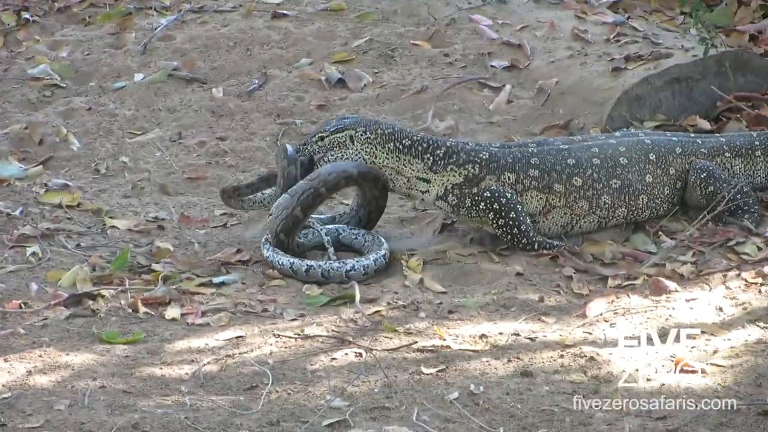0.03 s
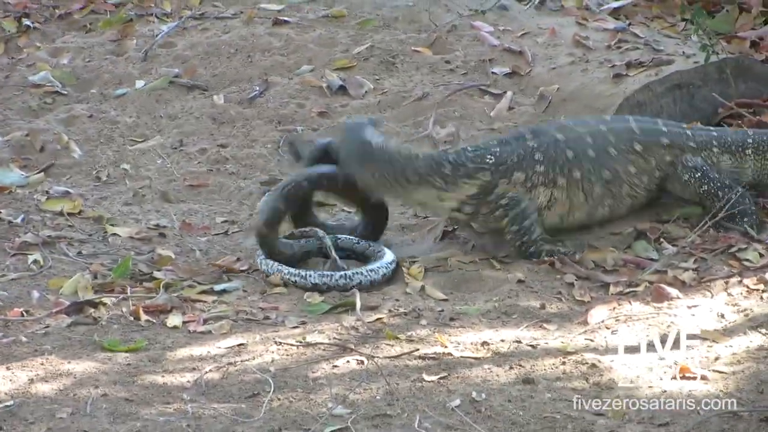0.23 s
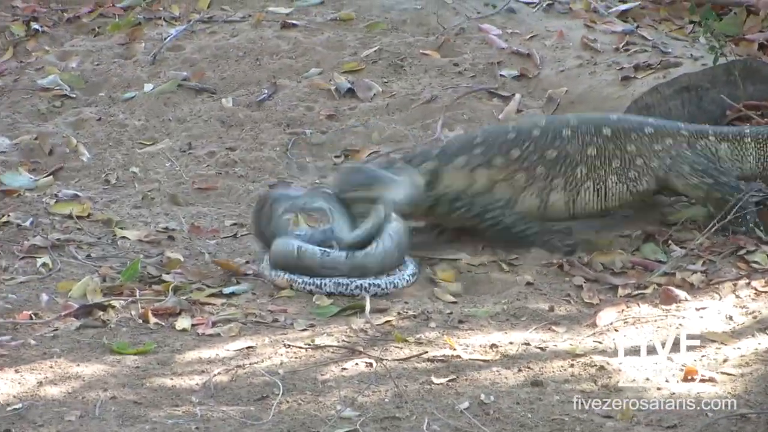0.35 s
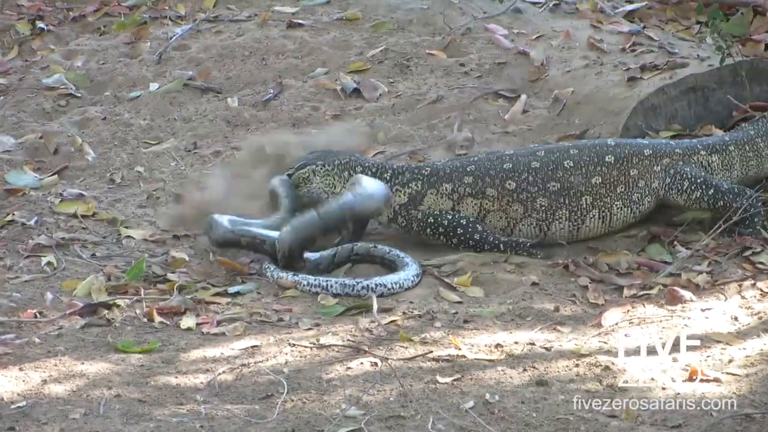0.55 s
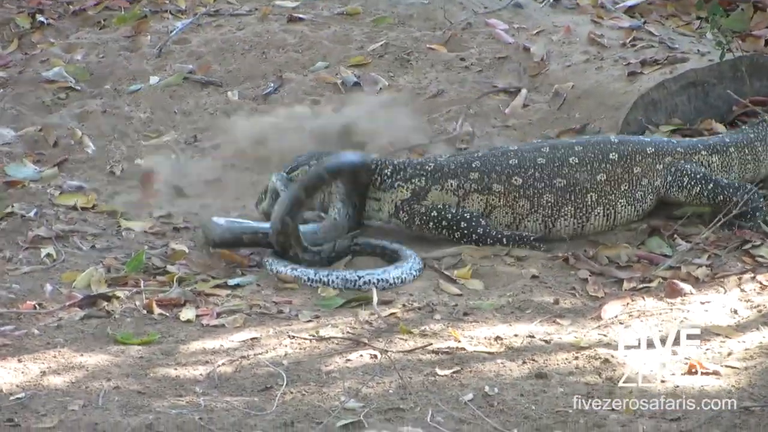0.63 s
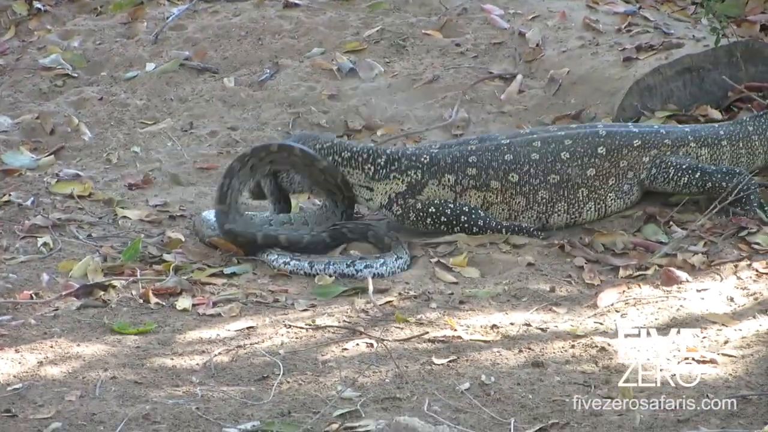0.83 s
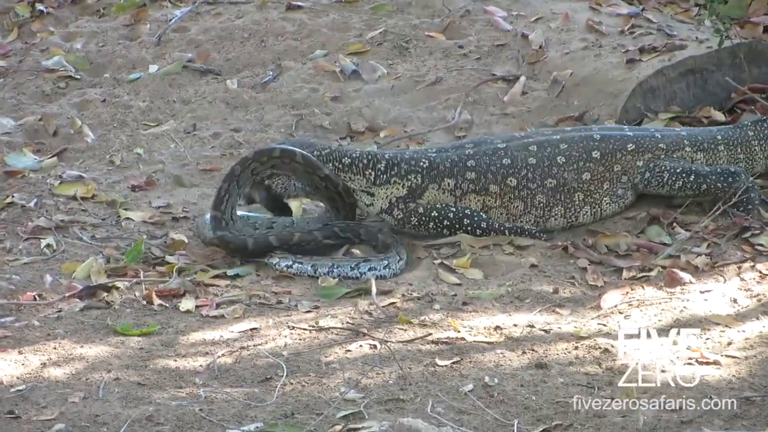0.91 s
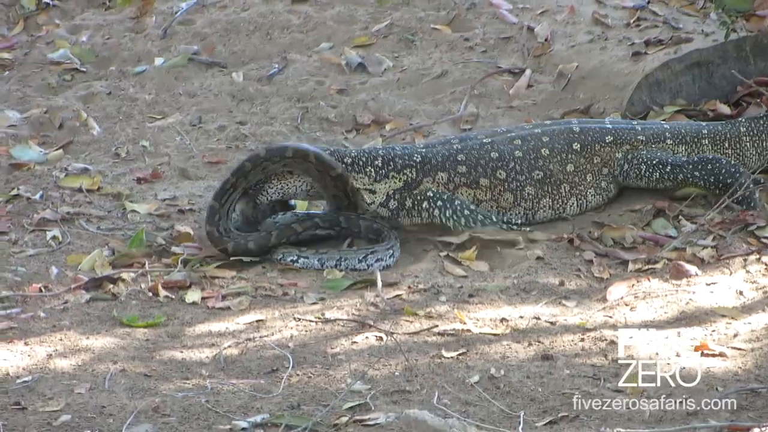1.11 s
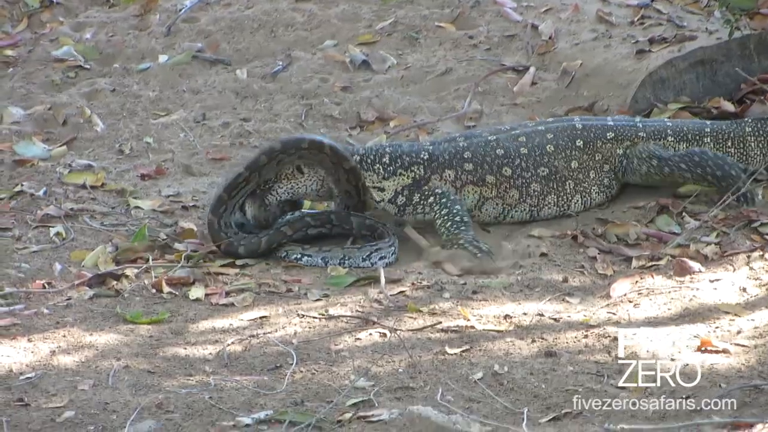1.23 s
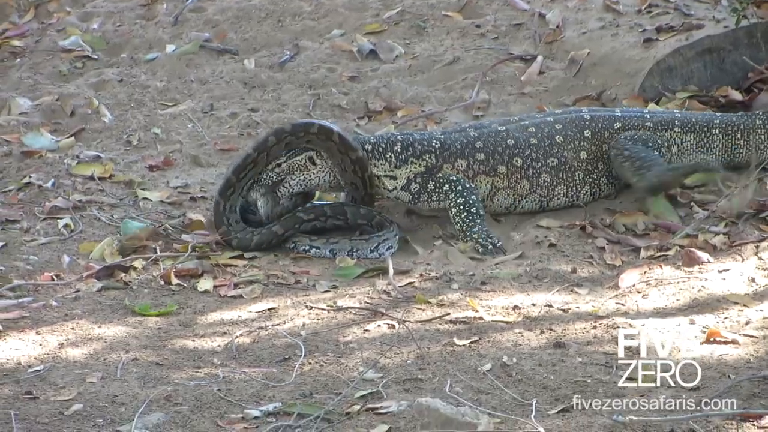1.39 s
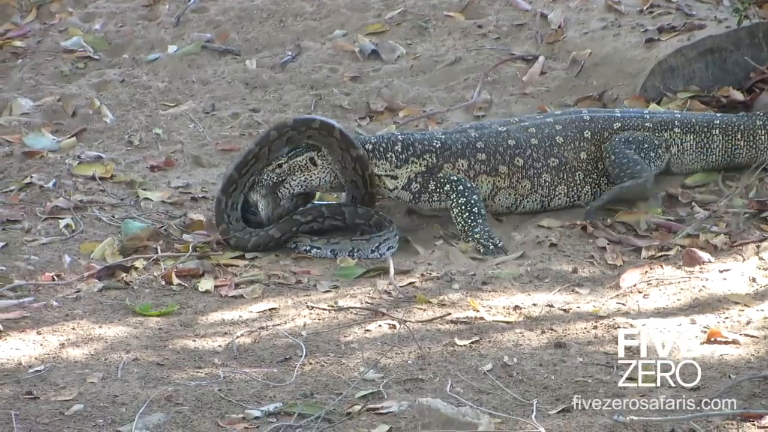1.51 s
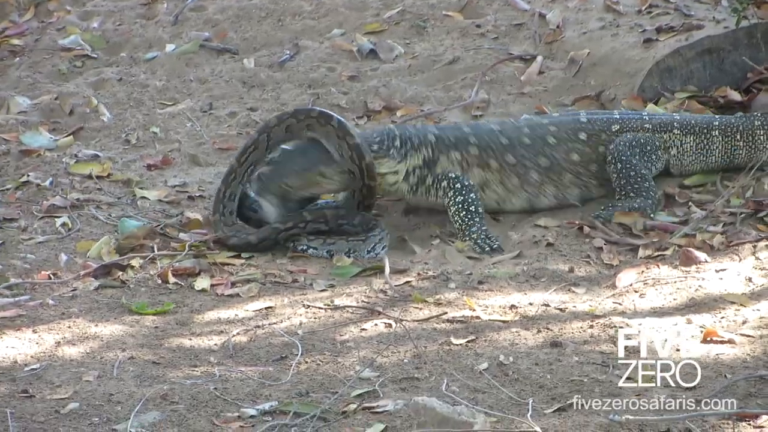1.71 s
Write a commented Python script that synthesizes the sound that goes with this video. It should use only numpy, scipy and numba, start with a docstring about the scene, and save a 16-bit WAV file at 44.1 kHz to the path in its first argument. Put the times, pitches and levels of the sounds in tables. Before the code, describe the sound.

Two breathy reptile hisses, first hard and whistling, then softer, over cicadas and bird ticks

```python
"""Lizard and python wrestling on dry leaves

Two hisses are rushing air: noise through resonances. The hard one swells into a thin whistle; the soft one
stays more level. Bumps are short noise bursts, leaves are many random clicks, and a small bird ticks about
six times a second, in two runs, with very fast falling whistles. Cicadas are a flickering band of noise
under a thin note; the bush is wide, steady noise, with a faint electronic hum and whine."""
import sys
import numpy as np
from scipy import signal
from scipy.fft import rfft, irfft
from scipy.io import wavfile
from scipy.ndimage import uniform_filter1d
from numba import njit

SR = 44100
rng = np.random.default_rng(int(sys.argv[2]) if len(sys.argv) > 2 else 0)


def generate_wav(signal):
    """Clip the signal to [-1, 1] and save it as 16-bit WAV at the path in sys.argv[1]."""
    frames = np.transpose(np.atleast_2d(signal))
    scaled = np.clip(frames, -1, 1) * 32767
    pcm = np.round(scaled).astype(np.int16)
    wavfile.write(sys.argv[1], SR, pcm)


N = 77175  # length of the scene [samples]


def undb(db):
    """Turn decibels into a gain."""
    return 10 ** (np.asarray(db) / 20)


def unit(x):
    """Scale a signal to an average strength (rms) of 1."""
    return x / np.sqrt(np.mean(x ** 2))


def times():
    """Give the time of each sample [s]."""
    return np.arange(N) / SR


def bins():
    """Give the frequency of each spectral bin [Hz], kept just above zero so that its log exists."""
    return np.arange(N // 2 + 1) * SR / N + 1e-3


def slope(points):
    """Draw a gain per bin through (frequency, dB) points, straight on a log-frequency axis."""
    hz, db = np.array(points).T
    return undb(np.interp(np.log(bins()), np.log(hz), db))


def colour(x, gain):
    """Filter a signal by a gain per bin, then scale it to rms 1."""
    return unit(irfft(rfft(x) * gain, N))


def noise(gain):
    """Make coloured noise of rms 1."""
    return colour(rng.standard_normal(N), gain)


def walk(rate):
    """Wander smoothly at random, with rms 1, from about `rate` new values a second."""
    hold = int(SR / rate)  # samples per random value
    steps = np.repeat(rng.standard_normal(N)[:N // hold + 1], hold)
    smooth = uniform_filter1d(uniform_filter1d(steps, hold), hold)
    return unit(smooth[:N])


def stereo(mid, side):
    """Turn what both ears share (mid) and what is opposed between them (side) into left and right."""
    return np.array([mid + side, mid - side])


@njit
def resonate(x, hz, width):
    """Ring a band-pass resonance whose centre frequency can move from sample to sample."""
    out, band, low = np.empty(len(x)), 0., 0.
    for i in range(len(x)):
        g = np.tan(np.pi * hz[i] / SR)
        damping = width / hz[i]
        v = (band + g * (x[i] - low)) / (1 + g * (g + damping))
        band = 2 * v - band
        low = low + 2 * g * v
        out[i] = damping * v
    return out


def hiss(pressure, air, whistles):
    """Rushing air rings fixed resonances and brightens with pressure; gliding resonances rise in pitch."""
    # fixed resonances that both hisses ring: (centre [Hz], width [Hz], lift [dB])
    resonances = [(2550, 90, 3), (2915, 90, 6), (3280, 110, 4), (3745, 55, 9), (4128, 45, 10),
                  (4205, 40, 7), (4405, 60, 9), (4975, 50, 6), (5100, 60, 7), (5475, 100, 7),
                  (5815, 65, 12), (5945, 40, 4), (6180, 45, 5)]
    # stereo width of the rush: (frequency [Hz], side level relative to mid [dB])
    spread = [(200, 0), (1500, -17), (3000, -18.5), (5800, -16), (8000, -10), (10500, -9), (15000, -3)]
    ripple_db, ripple_hz = 2.5, 35.54  # random unevenness of the spectrum and its spacing
    treble_hz, treble_lag_s = 3770, 0.038  # the treble follows the pressure a little late
    treble_growth = 0.15  # extra dB of treble per dB of pressure
    glide_range_db = 6  # pitches glide only within this much of full pressure
    pan_db = -.7  # left level relative to right

    at, levels = np.array(pressure).T
    db = np.interp(times(), at, levels, left=-100, right=-100)
    strain = np.maximum(db - levels.max(), -20)  # dB relative to full pressure, never above 0

    lift = sum(up / (1 + (2 * (bins() - hz) / width) ** 2) for hz, width, up in resonances)
    grid = np.arange(0, SR / 2, ripple_hz)
    ripple = ripple_db * np.interp(bins(), grid, rng.standard_normal(N)[:len(grid)])
    mid_gain = slope(air) * undb(lift + ripple)
    side_gain = mid_gain * slope(spread)
    side_level = np.sqrt(np.sum(side_gain ** 2) / np.sum(mid_gain ** 2))
    rush = stereo(noise(mid_gain), noise(side_gain) * side_level)

    low = irfft(rfft(rush) / (1 + (bins() / treble_hz) ** 10), N)
    treble = rush - low
    late_strain = np.interp(times() - treble_lag_s, times(), strain)
    out = low + treble * undb(treble_growth * late_strain)

    for hz, width, rise, level, growth in whistles:
        centre = hz + rise * np.maximum(strain, -glide_range_db)
        ring = resonate(rng.standard_normal(N), centre, 1. * width)
        ring = resonate(ring, centre, 2. * width)
        # growth less 1, because the whole hiss follows the pressure below
        out = out + unit(ring) * undb(level + (growth - 1) * strain)
    pan = undb(np.array([[pan_db], [-pan_db]]) / 2)
    return out * undb(db) * pan


def hard_hiss():
    """A forceful breath: high air pressure drives the rush and strongly gliding resonances."""
    # air pressure of the breath: (time [s], level [dB])
    pressure = [(.12, -71), (.196, -46), (.31, -37.5), (.41, -33.5), (.46, -33), (.52, -33.5), (.6, -35),
                (.745, -39), (.785, -46), (.83, -60)]
    # colour of the turbulence at the mouth: (frequency [Hz], relative level per Hz [dB])
    air = [(60, -37), (300, -31.5), (1000, -16.5), (1750, -26), (2300, -12), (3100, 0), (3600, -4),
           (4400, -2.5), (6000, -1.5), (7200, -7), (8900, -11.5), (10400, -6.5), (11800, -19), (15500, -27)]
    # gliding resonances: (centre at full pressure [Hz], width of first pass [Hz], rise [Hz per dB],
    # level at full pressure relative to the rush's base level [dB], growth [dB per dB of pressure])
    whistles = [(2944, 140, 39, -12.5, 1.5), (5840, 520, 68, -6.5, 1.5), (4390, 90, 57, -13, 2.0),
                (1435, 27, 22.5, -24, 1.2), (2820, 520, 30, -15, 0.3)]
    return hiss(pressure, air, whistles)


def whistle():
    """At the height of the hard hiss the air jet locks into a thin, wobbling tone that arches up and sinks."""
    # path of the tone before wobble and flutter: (time [s], pitch [Hz], level [dB])
    tone = [(.33, 2760, -60), (.395, 2860, -43), (.47, 2965, -39), (.525, 2920, -39.5), (.61, 2810, -46),
            (.7, 2640, -60)]
    wobble_hz, flutter_db = 22, 2.2  # rms of the random changes in pitch and level
    at, pitch, level = np.array(tone).T
    hz = np.interp(times(), at, pitch) + wobble_hz * walk(120)
    db = np.interp(times(), at, level, left=-120, right=-120) + flutter_db * walk(90.5)
    phase = 2 * np.pi * np.cumsum(hz) / SR
    return np.sqrt(2) * undb(db) * np.sin(phase)


def soft_hiss():
    """A gentler, more level breath: lower pressure drives softer rushing air and fewer gliding resonances."""
    # air pressure of the breath: (time [s], level [dB])
    pressure = [(.875, -59.5), (.94, -45), (.98, -42), (1.1, -39.5), (1.3, -41.5), (1.49, -42.5),
                (1.52, -52), (1.57, -63)]
    # colour of the turbulence at the mouth: (frequency [Hz], relative level per Hz [dB])
    air = [(60, -58), (400, -28), (1000, -20), (1750, -15.5), (2200, -7.5), (2500, -0.5), (3100, 2.5),
           (3600, -5.5), (5800, -4.5), (7200, -8), (8900, -15), (10600, -11), (11900, -26), (15500, -32)]
    # gliding resonances: (centre at full pressure [Hz], width of first pass [Hz], rise [Hz per dB],
    # level at full pressure relative to the rush's base level [dB], growth [dB per dB of pressure])
    whistles = [(2980, 550, 13, -16, 1.2), (1312, 34, 14, -22.5, 1)]
    return hiss(pressure, air, whistles)


def bumps():
    """Bodies bump the earth: each soft thud is a noise burst that starts fast and dies away."""
    # thuds: (time [s], level before the burst's shape [dB])
    thuds = [(0.433, -47), (.547, -55.5)]
    # colour of a thud: (frequency [Hz], relative level per Hz [dB])
    thud_colour = [(50, -18), (120, -2), (180, 9.5), (300, -6), (1000, 4.5), (2500, -33), (8000, -45)]
    attack_s, decay_s = 0.004, 0.015
    out = np.zeros((2, N))
    for start, db in thuds:
        age = np.maximum(times() - start, 0)
        shape = np.minimum(age / attack_s, 1) * np.exp(-age / decay_s)
        burst = stereo(noise(slope(thud_colour)), noise(slope(thud_colour)) / 2)
        out += undb(db) * shape * burst
    return out


def leaves():
    """Dry leaves crackle: many random clicks on each side, coloured and swelling once."""
    # colour of the crackle: (frequency [Hz], relative level per Hz [dB])
    leaf_colour = [(60, -18), (200, -1), (320, 16), (500, -2), (1050, 9), (2000, 17.5), (6000, -13),
                   (15000, -20)]
    peak_s, width_s, peak_db = .42, 0.17, -52  # the swell
    clicks_per_s = 1000  # average, on each side
    clicks = (rng.random((2, N)) < clicks_per_s / SR) * rng.standard_normal((2, N))
    crackle = np.array([colour(side, slope(leaf_colour)) for side in clicks])
    swell = np.exp(-((times() - peak_s) / width_s) ** 2 / 2)
    return crackle * undb(peak_db) * swell


def bird():
    """Each tick is a very fast falling whistle, scattered briefly by the trees."""
    # ticks: (time [s], peak level [dB])
    ticks = [(.055, -42.5), (.217, -44), (0.844, -39.5), (.998, -37), (1.154, -36.5), (1.307, -37),
             (1.463, -39.5), (1.619, -37.5)]
    top_hz, fall_s = 5150, .0135  # starting pitch and how fast it falls
    attack_s, decay_s = 0.0024, 0.0046
    echo_db, echo_s = -4, 0.062  # echo strength and how fast it fades
    t, calls = times(), np.zeros(N)
    for start, db in ticks:
        age = np.maximum(t - start, 0)
        phase = 2 * np.pi * top_hz * fall_s * (1 - np.exp(-age / fall_s))
        attack = np.minimum(age / attack_s, 1) ** 2
        decay = np.exp(-np.maximum(age - attack_s, 0) / decay_s)
        calls += undb(db) * attack * decay * np.sin(phase)

    # the scattered echo is a fading tail of noise, one for mid and one for side
    trees = rng.standard_normal((2, N)) * np.exp(-t / echo_s)
    trees /= np.sqrt(np.sum(trees ** 2, axis=1, keepdims=True))
    mid, side = (undb(echo_db) * signal.fftconvolve(calls, tail)[:N] for tail in trees)
    return stereo(calls + mid, side / 2)


def insects():
    """Cicadas drone as a band of noise with a random throb, with one thin, slightly wavering note."""
    # colour of the drone: (frequency [Hz], relative level per Hz [dB])
    cicadas = [(3000, -25), (6300, -18), (7000, -7), (7800, -2.5), (8300, -7.5), (9000, -18), (12000, -38)]
    drone_db, side_db = -51, -7  # mid level, and side relative to mid
    throb_db, throb_hz = 0.48, 90  # rms level change, and random values per second
    note_hz, waver_hz, note_db = 7740, 8.3 / 2, -64.5  # waver is rms

    def drone():
        """Make cicada noise whose level throbs at random."""
        return noise(slope(cicadas)) * undb(drone_db + throb_db * walk(throb_hz))

    mid, side = drone(), drone()
    pitch = note_hz + waver_hz * walk(29.9)
    note = np.sqrt(2) * np.sin(2 * np.pi * np.cumsum(pitch) / SR)
    return stereo(mid + undb(note_db) * note, undb(side_db) * side)


def bush():
    """Distant air and foliage murmur as steady noise, partly shared and partly opposed between the ears."""
    # colour shared by both sides: (frequency [Hz], relative level per Hz [dB])
    mid_colour = [(25, -3.5), (60, 1.5), (150, -4), (400, -4), (700, 0.5), (1400, 1.5), (2400, 0.5),
                  (3700, 4.5), (5200, -3), (6500, 0.5), (9500, -11.5), (12000, -13.5), (15500, -23)]
    # colour opposed between the sides: (frequency [Hz], relative level per Hz [dB])
    side_colour = [(25, -1), (55, -2), (80, -13), (140, -2), (300, -1.5), (750, 0), (1500, -3), (2800, -8),
                   (5200, -12.5), (9500, -18.5), (12000, -24), (15500, -29)]
    mid_db, side_db = -52, -47
    return stereo(undb(mid_db) * noise(slope(mid_colour)), undb(side_db) * noise(slope(side_colour)))


def electronics():
    """Steady sine tones: a faint hum, opposed between the sides, and a high whine in the middle."""
    # pitches of the hum [Hz]
    hum_hz = [60, 99]
    hum_db, whine_hz, whine_db = -73, 15734, -70.5  # hum level is for each tone

    def tone(hz):
        """Make a sine of rms 1 with a random starting phase."""
        return np.sqrt(2) * np.sin(2 * np.pi * (hz * times() + rng.random()))

    return stereo(undb(whine_db) * tone(whine_hz), undb(hum_db) * sum(tone(hz) for hz in hum_hz))


def scene():
    """Add both hisses, the struggle on the ground, and the sounds of the bush."""
    hisses = hard_hiss() + whistle() + soft_hiss()
    struggle = bumps() + leaves()
    return hisses + struggle + bird() + insects() + bush() + electronics()


def record(dry):
    """Cut everything above 16 kHz steeply with a low-pass filter."""
    low_pass = signal.ellip(12, .1, 80, 16000, fs=SR, output="sos")  # order, ripple [dB], cut [dB], edge [Hz]
    return signal.sosfilt(low_pass, dry)


dry = scene()
out = record(dry)
generate_wav(out)
```